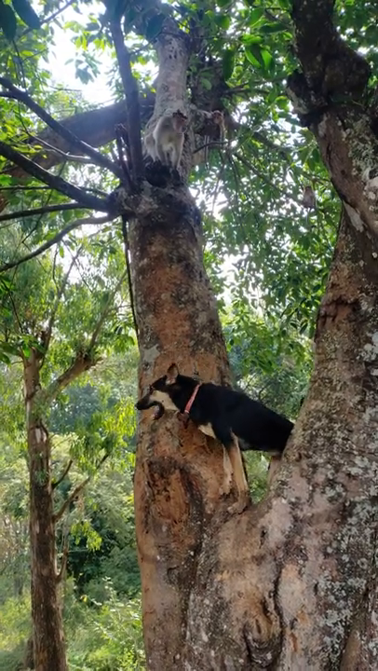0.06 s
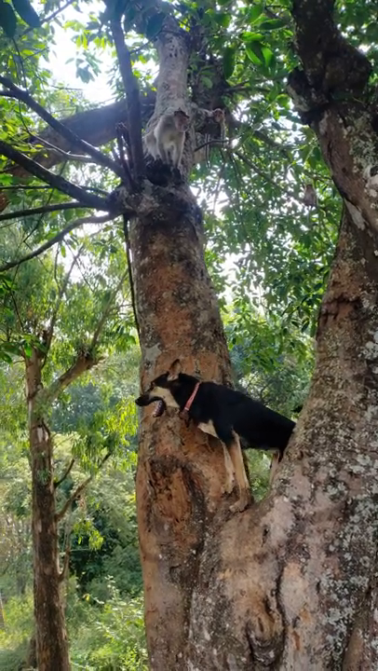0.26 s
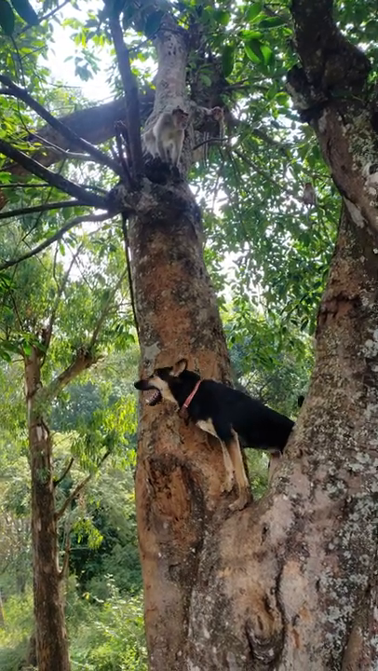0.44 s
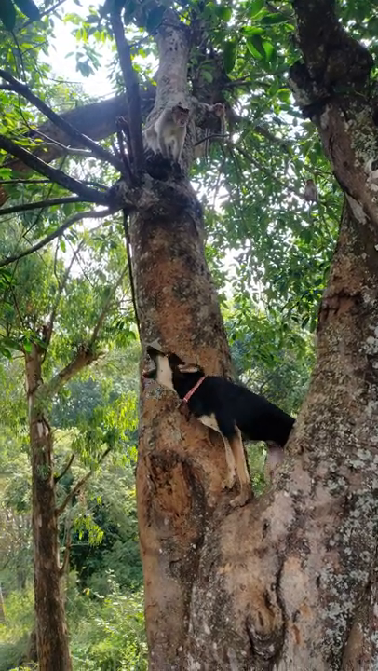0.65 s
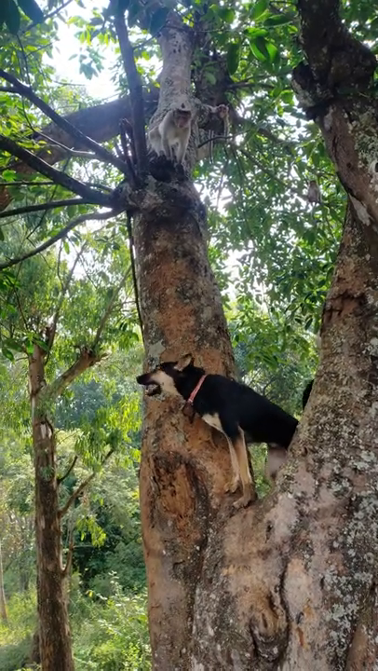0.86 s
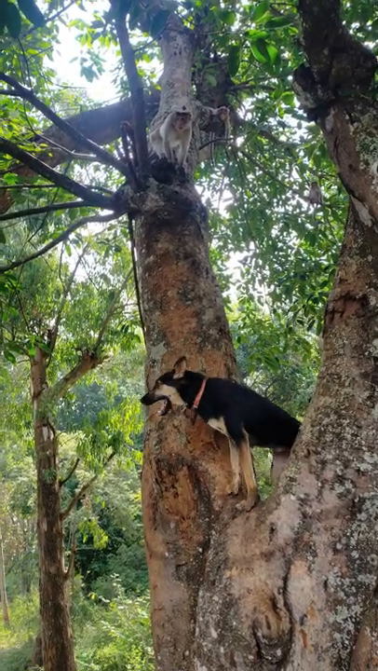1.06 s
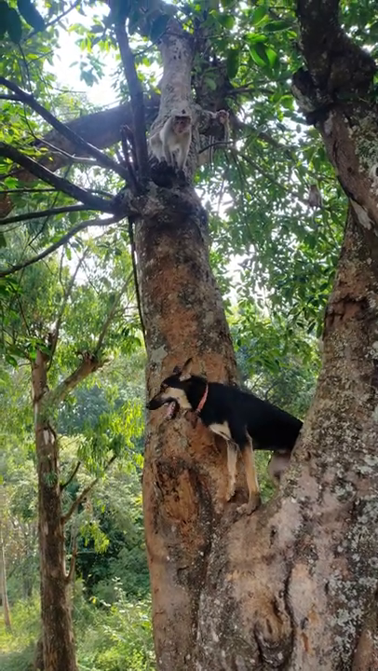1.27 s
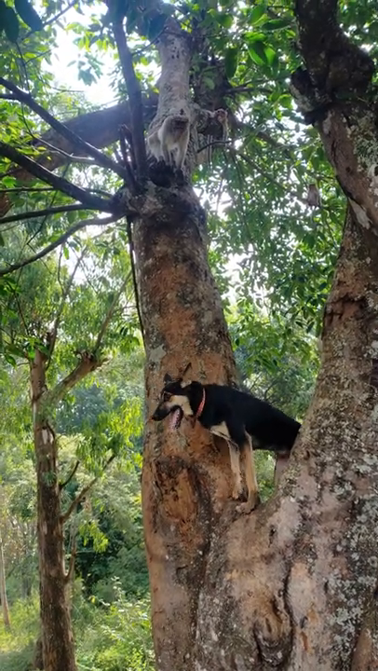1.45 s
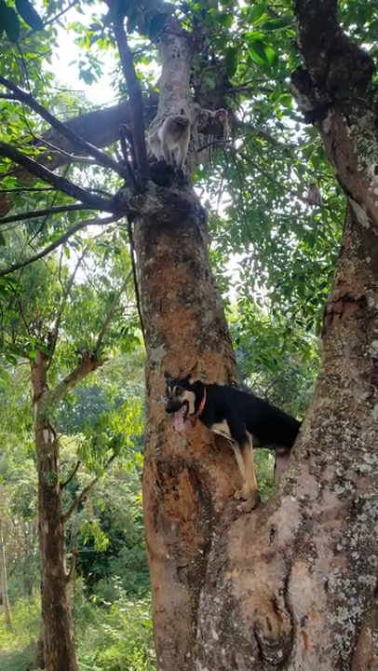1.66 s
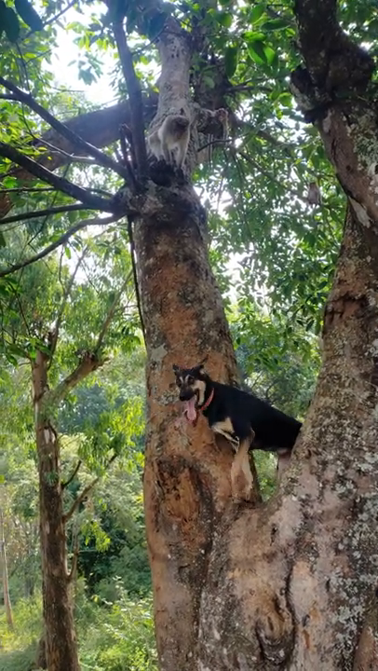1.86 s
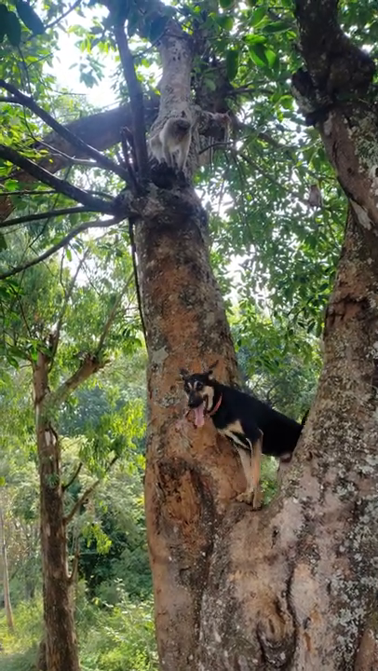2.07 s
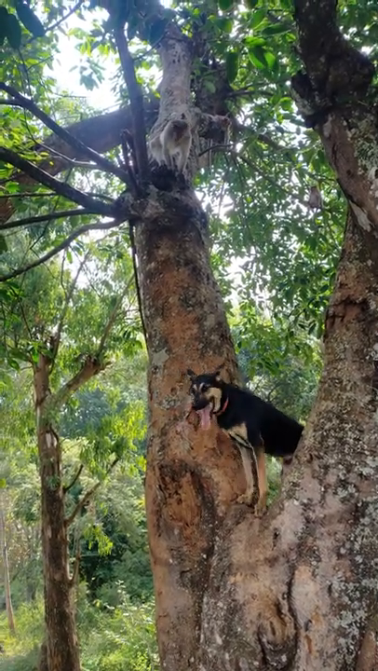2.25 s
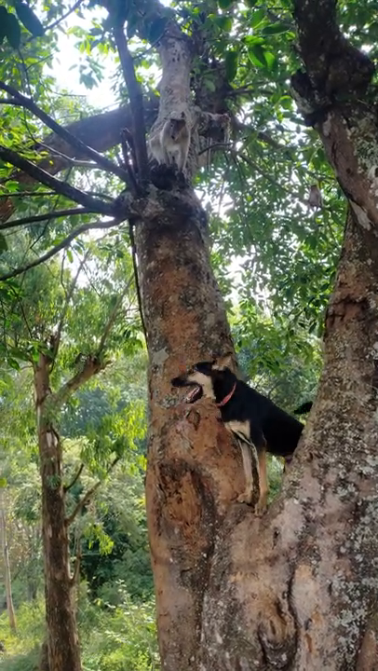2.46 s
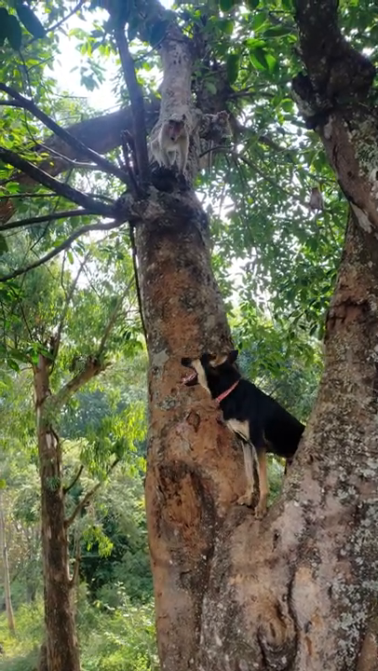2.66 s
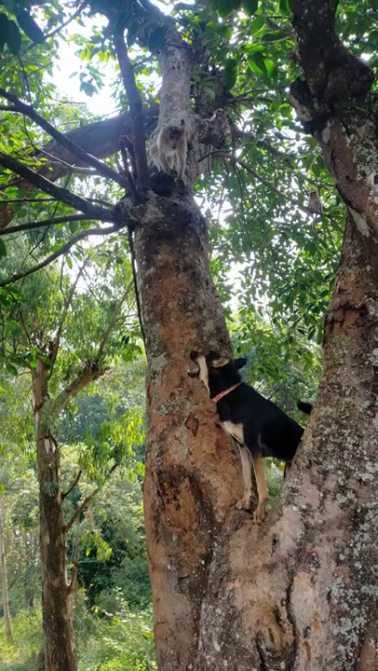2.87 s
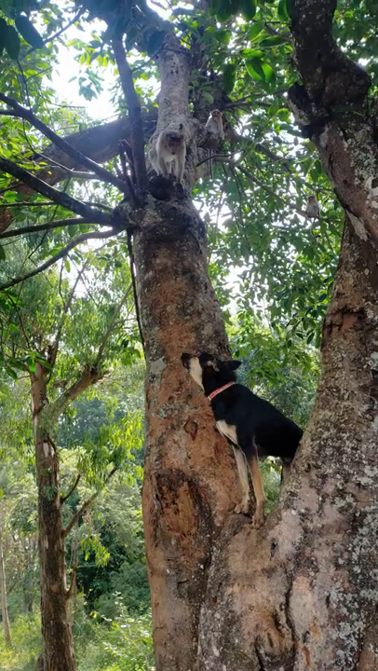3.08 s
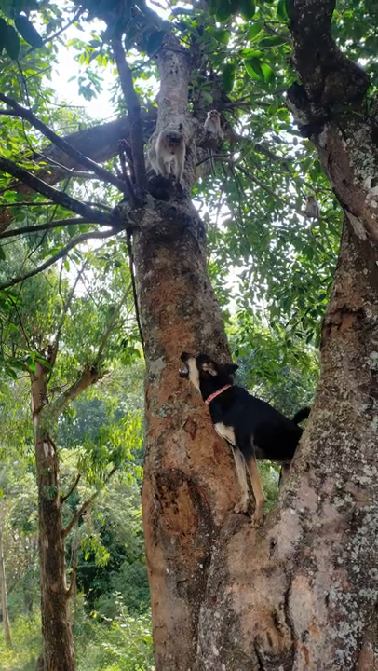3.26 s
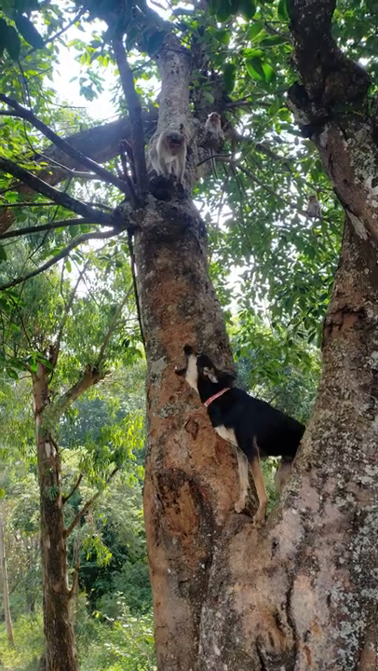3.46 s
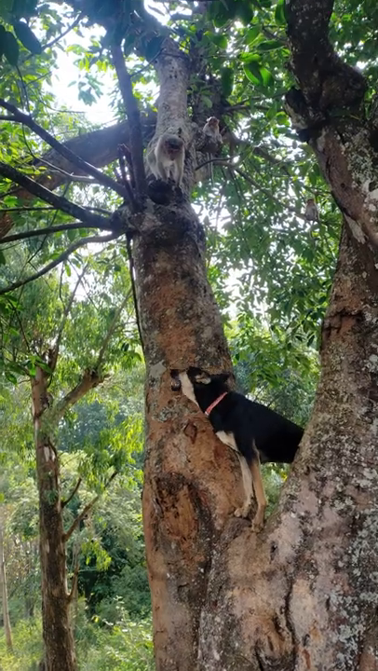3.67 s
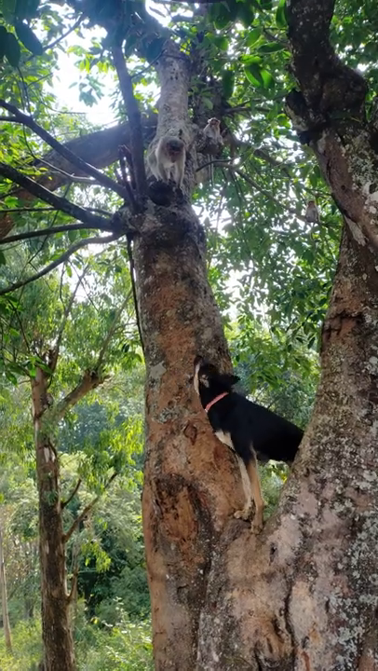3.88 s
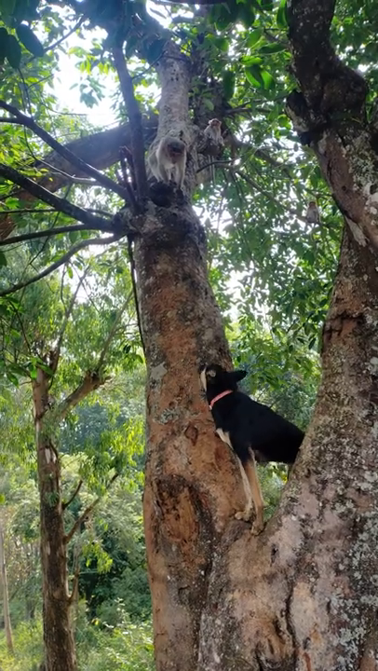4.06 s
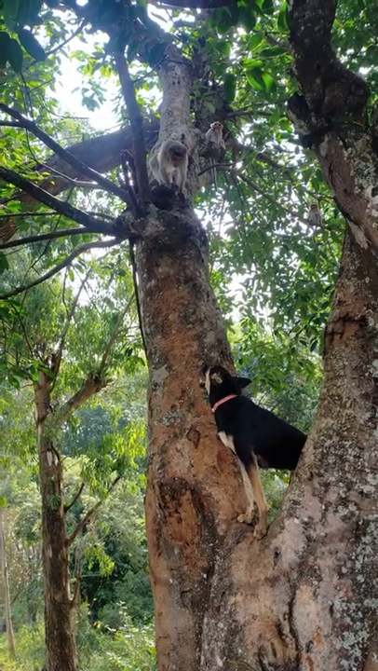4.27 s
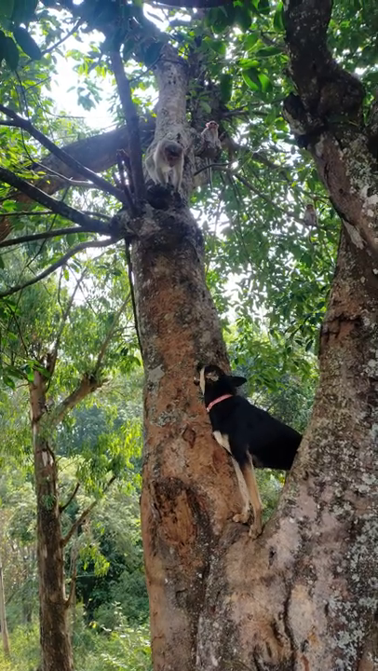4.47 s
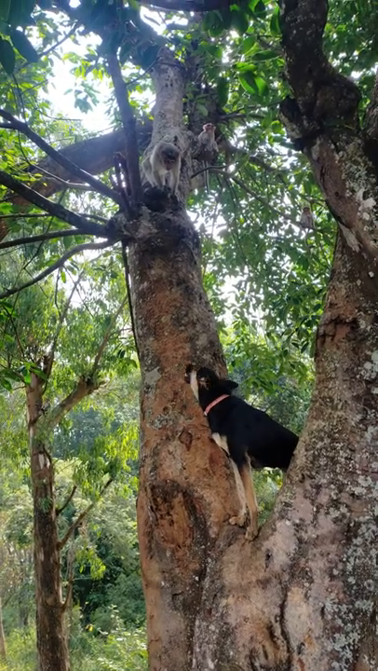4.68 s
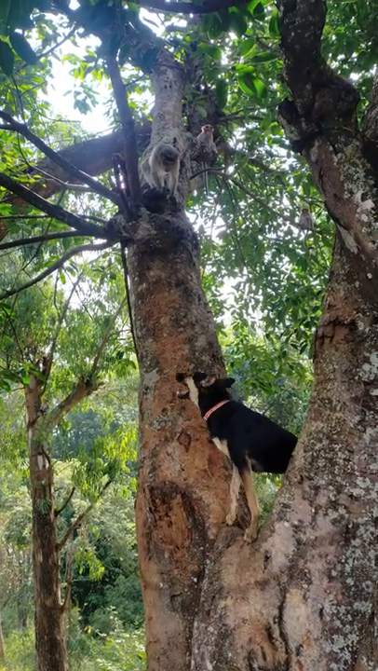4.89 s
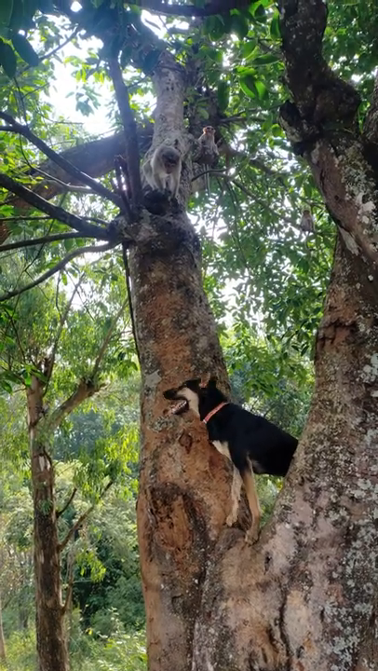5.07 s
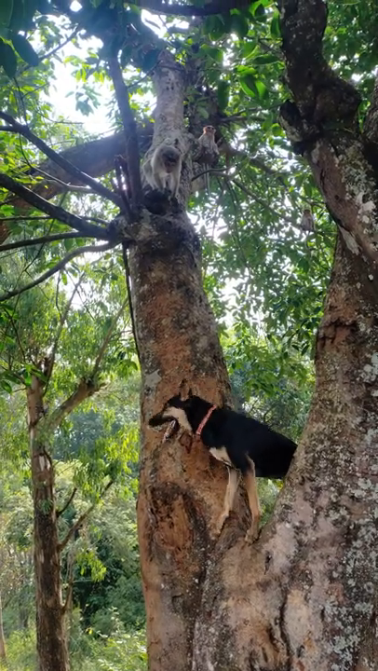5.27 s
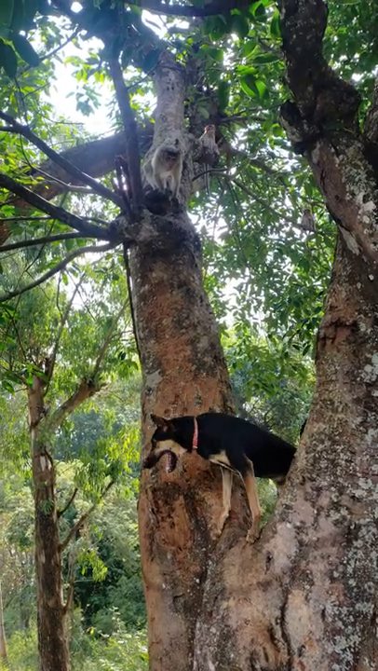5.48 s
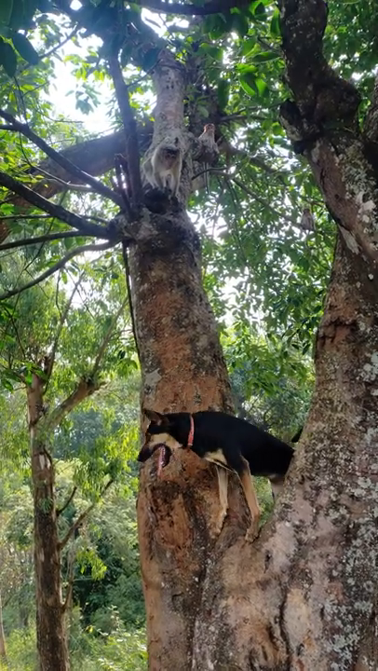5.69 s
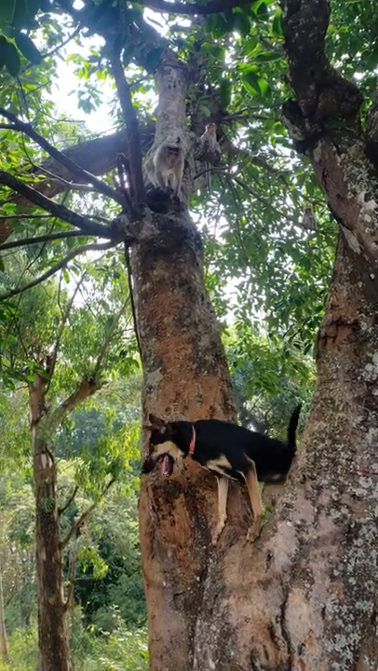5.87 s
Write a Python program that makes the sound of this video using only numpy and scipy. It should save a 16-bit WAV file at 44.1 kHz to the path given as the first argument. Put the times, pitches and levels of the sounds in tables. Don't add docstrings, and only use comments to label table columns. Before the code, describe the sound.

Five short, rough dog barks ring through woodland, with a rattling snore-like inhale after the first, over faint insects and light wind thumps.

```python
import sys
import numpy as np
from scipy import signal
from scipy.fft import rfft, irfft, next_fast_len
from scipy.io import wavfile
from scipy.ndimage import uniform_filter1d, minimum_filter1d

SR = 44100
rng = np.random.default_rng(int(sys.argv[2]) if len(sys.argv) > 2 else 0)


def persist_wave(psi):
    counts = np.round(np.clip(psi, -1, 1) * 32767).astype(np.int16)
    wavfile.write(sys.argv[1], SR, np.atleast_2d(counts).T)


def gain_from_db(level_db):
    decades = np.asarray(level_db, float) / 20
    return 10 ** decades


N = 261513
LEAD = SR
DELAY_S = .004
# t/s, level/dB, hum f/Hz, hum level/dB
SNORE_CURVE = [(2.44, -71.5, 204, -74), (2.55, -46, 191.7, -59.5), (2.62, -42, 190.5, -58),
               (2.68, -37, 185, -65.5), (2.75, -41.5, 177.3, -53.5), (2.83, -45, 156.3, -50),
               (2.88, -56, 132.3, -52.5), (2.92, -63, 122.5, -60)]


def evened(x):
    return x / np.sqrt(np.mean(x ** 2) + 1e-20)


def noise(length):
    return rng.standard_normal(length)


def read(points, hz):
    f, value = np.transpose(points)
    return np.interp(np.log(hz + 1), np.log(f + 1), value)


def columns(rows):
    s, *rest = np.transpose(rows)
    t = np.arange(s[0], s[-1], 1 / SR)
    return [t] + [np.interp(t, s, c) for c in rest]


def add(mix, s, sound):
    part = mix[round(s * SR):][:len(sound)]
    part += sound[:len(part)]


def coloured(x, points):
    size = next_fast_len(len(x) + 2048)
    gain = gain_from_db(read(points, np.fft.rfftfreq(size, 1 / SR)))
    return evened(irfft(rfft(x, size) * gain, size)[:len(x)])


def resonate(x, hz, width):
    turn = np.exp(2j * np.pi * np.cumsum(hz * np.ones(len(x))) / SR)
    r = np.exp(-np.pi * width / SR)
    once = signal.lfilter([1 - r], [1, -r], x / turn + 1e-18)
    return 2 * (turn * signal.lfilter([1 - r], [1, -r], once)).real


def drift(length, hz):
    width = max(int(SR / hz), 1)
    return evened(uniform_filter1d(uniform_filter1d(noise(length), width), width))


def air():
    # f/Hz, level/dB per Hz
    leaf_colour = [(88, -50), (150, -10), (752, -9.5), (847, -5), (1030, -10.5), (1330, -3), (1590, -17),
                   (1720, -7), (2220, -9.5), (3420, -12), (4330, -18), (7370, -12), (9700, -26),
                   (15300, -10.5), (16500, -21.5)]
    # f/Hz, width/Hz, level/dB
    insects = [(5350, 280, -71.5), (5667, 180, -72), (6474, 100, -71), (6830, 84, -74), (7190, 44, -68),
               (7370, 98, -69), (7727, 120, -73), (8100, 170, -72)]
    swell_db = drift(N, 1.4)
    out = gain_from_db(-59 + 0.91 * drift(N, 3.9)) * coloured(noise(N), leaf_colour)
    for hz, width, db in insects:
        out += gain_from_db(db + 0.49 * swell_db) * evened(resonate(noise(N), hz, width))
    return out


def wind():
    # t/s, level/dB
    gusts = [(0.0, -43), (0.26, -52.5), (0.63, -51), (0.69, -60.5), (1.53, -45.5), (1.8, -63.5),
             (2.84, -56), (3.15, -66), (3.2, -56.5), (4.1, -62), (4.21, -45.5), (4.61, -45), (4.74, -60),
             (4.84, -45), (5.33, -46), (5.37, -55.5), (5.85, -41.5), (5.93, -48)]
    t, thump_db = columns(gusts)
    flutter_db = -65.5 + 0.72 * (thump_db + 55)
    thump = coloured(noise(len(t)), [(5, 2), (20, 8.0), (45, 4.5), (70, -18), (120, -52.0)])
    flutter = coloured(noise(len(t)), [(40, -32), (65, 5.0), (110, -4.0), (200, -26.5), (400, -36.5)])
    lumps_db = drift(len(t), 14.0)
    pressure = gain_from_db(thump_db + 2.4 * lumps_db) * thump
    pressure += gain_from_db(flutter_db + 3.6 * lumps_db) * flutter
    return np.pad(pressure, (0, N))[:N]


def wood(x):
    # f/Hz, t60/s
    decay = [(250, 1.23), (700, 1.47), (1400, 1.79), (2500, 1.64), (5000, 4.5), (12000, 0.93)]
    # delay/s, spread/s, level/dB
    echoes = [(0.049, 0.02, -20.5), (.12, 0.023, -18), (0.199, 0.024, -33)]
    length = 2 * SR
    t, taps = np.arange(length) / SR, np.zeros(length)
    at = np.arange(400, length - 20, 20)
    taps[at + rng.integers(0, 20, len(at))] = rng.choice([-1., 1.], len(at))
    hz, frame_s, z = signal.stft(taps, SR, nperseg=256)
    dying = gain_from_db(-60 * frame_s / read(decay, hz)[:, None])
    tail = signal.istft(z * dying, SR, nperseg=256)[1][:length]
    back = gain_from_db(-19) * tail / np.linalg.norm(tail) * 1.257
    for delay, spread, db in echoes:
        echo = taps * np.exp(-.5 * ((t - delay) / spread) ** 2)
        back += gain_from_db(db) * signal.lfilter([.5], [1, -.5], echo / np.linalg.norm(echo))
    thin = signal.butter(2, 380, "high", fs=SR)
    return signal.lfilter(*thin, signal.fftconvolve(x, back)[:len(x)])


def wind_knocks():
    # t/s, f/Hz, level/dB
    puffs = [(4.44, 176, -50), (3.2, 130, -56), (2.4, 570, -64.5), (0.48, 55, -52), (1.4, 63, -54),
             (3.72, 106, -57), (.62, 90, -48), (0.063, 96, -50), (4.87, 90, -46.5), (5.08, 101, -52.5),
             (5.2, 78, -49.5)]
    out, size = np.zeros(N), 3000
    for s, hz, db in puffs:
        add(out, s - .03, gain_from_db(db) * evened(resonate(noise(size), hz, 66)) * np.hanning(size))
    return out


def twigs():
    # t/s, peak level/dB, ring f/Hz, brightness/dB, t60/s
    ticks = [(0.0713, -36.5, 1800, -27, 0.051), (1.3341, -28, 2380, -12, 0.019),
             (1.5272, -40, 1800, -6, 0.025), (1.54, -32.5, 1980, -27, 0.017),
             (1.5552, -35, 3030, -1.5, 0.064), (1.5812, -25.5, 4260, -4.5, 0.0095),
             (1.8893, -37, 3480, -10, 0.026), (1.918, -41, 1720, -17, 0.087),
             (2.1096, -40.5, 1710, -19, 0.02), (2.173, -45.5, 2417, 3, 0.014),
             (2.3974, -48.5, 1680, -1, 0.02), (5.218, -39.5, 1804, -18, 0.015),
             (5.548, -51, 5560, -6, 0.021), (5.8135, -36, 2600, -9, 0.027), (5.8286, -41, 3400, -1, 0.06),
             (5.844, -45, 2360, 2, 0.025), (5.869, -49, 2390, -5, 0.017)]
    size = 3000
    out, t = np.zeros(N), np.arange(size) / SR
    for s, db, hz, bright_db, t60 in ticks:
        burst = noise(size)
        ring = evened(resonate(burst, hz, 4500))
        crack = gain_from_db(bright_db + 5.5 - 2600 * t) * evened(resonate(burst, 14000, 7700))
        add(out, s, gain_from_db(db - 8.0 - 60 * t / max(t60, .003)) * (ring + crack))
    return out


def course(call, run_up_s, growl_db, end_s, hum_db, second_hz):
    # stage (-1 run-up starts, 0 snap, 1 close), chest hum/dB, breath over effort/dB
    stages = [(-1.1, -62.5, -11.5), (-0.62, -52, -21.5), (0, -45.5, -32), (0.26, -60, -29.5),
              (0.82, -65, -24), (0.062, -72.5, -26)]
    shut_jaw_hz, jaw_share = 790, 0.16
    (snap, _, first_hz, open_hz), (close, last_db, last_hz, shut_hz) = call[0], call[-1]
    before = [(snap - run_up_s, growl_db - 17, first_hz - 600 * run_up_s, shut_jaw_hz),
              (snap - 1e-4, growl_db, first_hz, open_hz)]
    after = [(close + end_s, last_db - 24, last_hz - 650 * end_s, shut_hz)]
    t, effort_db, hz, mouth_hz = columns(before + call + after)
    stage = np.interp(t, [t[0], snap, close, t[-1]], [-1, -0.014, 1, 1.8])
    at, chest_db, breath_db = np.transpose(stages + [(1.4, hum_db, stages[-1][2])])
    return (t, stage, effort_db, hz, np.interp(stage, at, chest_db), np.interp(stage, at, breath_db),
            mouth_hz, second_hz + jaw_share * (mouth_hz - shut_jaw_hz))


def vocal_folds(stage, hz, clearest):
    size = len(hz)
    share, clear_odd, clear_rough = clearest
    clear = np.exp(-((stage - share) / .29) ** 4)
    odd = .9 + (clear_odd - .9) * clear
    rough = .55 + (clear_rough - .55) * clear
    turns = np.cumsum(hz * (1 + .07 * rough * drift(size, 120))) / SR
    pulses = np.zeros(size)
    for k in range(3, 15):
        waver = gain_from_db((.8 + .22 * k) * drift(size, 60))
        fade = gain_from_db(-.006 * np.maximum(k * hz - 2280, 0))
        slip = .15 * (k - 3) * drift(size, 73)
        line = np.cos(2 * np.pi * k * turns + 0.0812 * k * k + slip)
        pulses += (odd if k % 2 else 1) * waver * fade * line
    pulses += np.clip(1 - 1.33 * odd, 0, 1) * np.cos(4 * np.pi * turns)
    gate = .3 + np.exp(-(2 * turns % 1) / .35)
    drive = (1 - rough) * pulses / np.sqrt(3.75 * (1 + odd ** 2))
    drive += 1.6 * rough * evened(gate * noise(size))
    drive += .24 * evened(resonate(gate * noise(size), 2200, 1500))
    return turns, gate, drive


def bark(call, around, clearest, highs):
    # width/Hz, level/dB
    moving = [(230, 2.5), (280, -2)]
    # f/Hz, width/Hz, level/dB
    upper = [(693, 160, -10.5), (1243, 207, -3), (1847, 547, -7.5), (2440, 520, -10.5)]
    # f/Hz, width/Hz, level/dB, fade/s
    snap_ring = (2940, 448, -25, 0.08)
    # f/Hz, level/dB per Hz
    teeth = [(1760, -37), (3000, -1), (3340, -3), (4220, -11), (4700, -8.5), (6570, -10.5), (9060, -23),
             (15100, -11.5), (16200, -13), (16500, -64)]
    # t/s, jump/dB
    flaps = [(.538, 8), (0.574, 10), (2.945, 8), (2.968, 6.5), (3.45, 1.5), (3.896, 7.5), (3.908, 4.5),
             (4.593, 7)]
    t, stage, effort_db, hz, chest_db, breath_db, *mouth_hz = course(call, *around)
    size = len(t)
    effort_db = uniform_filter1d(effort_db, 350)
    hz = uniform_filter1d(hz, 900)
    turns, gate, drive = vocal_folds(stage, hz, clearest)

    ring_hz, ring_width, ring_db, fade = snap_ring
    breath_extra_db, ring_extra_db = highs
    ring_db = ring_db + ring_extra_db * np.exp(-((t - call[0][0] - .015) / fade) ** 2)
    heard = t + DELAY_S
    flaps_db = sum(db * (heard > s) * np.exp(-abs(heard - s) / 0.011) for s, db in flaps)
    upper_db = (stage < 0) * (-5 + 0.32 * flaps_db)
    modes = [(f, *m) for f, m in zip(mouth_hz, moving)] + upper + [(ring_hz, ring_width, ring_db)]
    throat = np.zeros(size)
    for k, (f, width, db) in enumerate(modes):
        throat += (-1) ** k * gain_from_db(db + (k > 0) * upper_db) * resonate(drive, f, width)
    muzzle = signal.butter(3, [430, 3050], "band", fs=SR, output="sos")
    throat = signal.sosfilt(muzzle, throat)
    throat /= np.sqrt(uniform_filter1d(throat ** 2, 900) + 1e-12)

    breath = gain_from_db(breath_db + breath_extra_db) * gain_from_db(2.1 * drift(size, 50)) * coloured(gate * noise(size), teeth)
    voice = gain_from_db(effort_db + flaps_db) * (throat + breath)
    rumble = 0.94 * evened(resonate(noise(size), hz, 140))
    chest = gain_from_db(chest_db) * (np.cos(2 * np.pi * turns) + rumble)
    return (voice + chest) * signal.windows.tukey(size, .06)


def birds():
    # middle t/s, from f/Hz, to f/Hz, length/s, level/dB
    chirps = [
        (4.45, 2800, 3250, .1, -57),
        (4.53, 3300, 3380, .14, -62),
        (5.5, 2850, 2450, .03, -58),
        (5.8, 2800, 2500, .04, -60),
        (.605, 3300, 3000, .06, -54),
    ]
    out = np.zeros(N)
    for s, from_hz, to_hz, length, db in chirps:
        glide = np.linspace(from_hz, to_hz, int(length * SR))
        tone = np.sin(2 * np.pi * np.cumsum(glide) / SR)
        add(out, s - length / 2, gain_from_db(db) * tone * np.hanning(len(glide)))
    return out


def far_note():
    # multiple of the pitch, level/dB
    overtones = [(1, -69.5), (2, -69.5), (3.3, -78.5)]
    start_s, length_s = 1.6, 0.93
    share = np.arange(0, length_s, 1 / SR) / length_s
    size = len(share)
    turns = np.cumsum((880 - 47.55 * share) * (1 + 0.0048 * drift(size, 36))) / SR
    notes = sum(gain_from_db(db + 4.2 * drift(size, 39)) * np.cos(2 * np.pi * k * turns) for k, db in overtones)
    out = np.zeros(N)
    add(out, start_s, np.sqrt(2) * gain_from_db(4.5 * share) * notes * signal.windows.tukey(size, .15))
    return out


def snore():
    # f/Hz, level/dB per Hz
    rattle_colour = [(47, -62), (80, -32), (173, -2.5), (325, -9), (690, -1), (746, -1.5), (909, 4.5),
                     (1090, -6.5), (1750, -2), (2390, -20), (3420, -18.5), (7100, -22.5), (9000, -47),
                     (11700, -68.5), (19800, -120)]
    # f/Hz, width/Hz, level/dB
    nose = [(3500, 250, -16.5), (4630, 380, -29)]
    t, level_db, hum_hz, hum_db = columns(SNORE_CURVE)
    size = len(t)
    flap = ((t - 2.451) * 30.2 + .05 * drift(size, 13)) % 1
    depth = np.clip(1 - (t - t[0]) / .35 * .8, .2, 1)
    chop = 1 - depth + 1.37 * depth * np.minimum(flap / 0.19, 1) * np.exp(-(flap / .5) ** 3)
    turns = np.cumsum(129.8 * (1 + 0.27 * drift(size, 60))) / SR
    gate = 0.19 + np.exp(-(turns % 1) / 0.52)
    drive = np.diff(np.floor(turns), prepend=0) * 8 + gate * noise(size)
    rattle = coloured(drive, rattle_colour)
    rattle += sum(gain_from_db(db) * evened(resonate(drive, hz, width)) for hz, width, db in nose)
    rush = np.sqrt(chop) * gate * noise(size)
    hiss = evened(resonate(resonate(rush, 14100, 5000), 14400, 5400))
    hum = gain_from_db(hum_db) * np.sqrt(2) * np.cos(2 * np.pi * np.cumsum(hum_hz) / SR)
    breath = gain_from_db(level_db) * (rattle + gain_from_db(-10) * hiss) + hum
    return chop * breath * signal.windows.tukey(size, .1)


def scene():
    # t/s, effort/dB, slow fold rate f/Hz, first throat resonance f/Hz
    calls = [
        [(0.641, -20, 193.3, 580), (0.69, -15.5, 210.3, 596), (0.724, -20, 248.7, 774),
         (0.748, -15.5, 244.7, 794), (0.772, -21, 203.8, 750)],
        [(2.972, -33.5, 169.7, 680), (3.005, -13.5, 192.1, 674), (3.058, -19, 247.6, 770),
         (3.098, -17.5, 234.7, 690), (3.12, -21, 214, 630)],
        [(3.447, -28, 197.4, 620), (3.471, -14, 204.8, 600), (3.521, -17, 224.7, 687), (3.569, -17, 217, 770),
         (3.59, -23.5, 207.3, 776)],
        [(3.92, -22.5, 188, 610), (3.936, -16.5, 185.6, 612), (3.972, -17, 214.4, 767),
         (4.016, -18, 225.5, 830), (4.065, -22, 201, 800)],
        [(4.608, -20.5, 201.7, 740), (4.648, -14.5, 205.5, 716), (4.688, -19, 244.9, 880),
         (4.708, -17, 234.3, 810), (4.742, -20.5, 192, 800)],
    ]
    # growled run-up/s, growl at the snap/dB, dying end/s, chest hum/dB, second resonance f/Hz
    arounds = [
        (.118, -33.5, 0.054, -64, 1297),
        (.082, -41, 0.046, -58, 1375),
        (.037, -33.5, .06, -57.5, 1284),
        (.08, -35.5, .08, -51, 1363),
        (.088, -35.5, .075, -56, 1380),
    ]
    clearest = [
        (.62, .2, .25),
        (.57, .2, .25),
        (.3, .8, .4),
        (.55, .75, .3),
        (.7, .7, .42),
    ]
    # breath/dB, bright ring at the snap/dB
    bark_highs = [(-0.5, 3), (3.5, 6), (1, 16.5), (2, 20), (0, 16)]
    dog = np.zeros(LEAD + N)
    for parts in zip(calls, arounds, clearest, bark_highs):
        start = LEAD / SR + DELAY_S + parts[0][0][0] - parts[1][0]
        add(dog, start, bark(*parts))
    add(dog, start - 5, gain_from_db(-1.5) * bark(*parts))
    add(dog, LEAD / SR + SNORE_CURVE[0][0], snore())
    small_sounds = wind_knocks() + twigs() + birds() + far_note()
    return ((dog + wood(dog))[LEAD:] + air() + wind() + small_sounds)[None]


def roll_off(x):
    return signal.sosfilt(signal.butter(12, 16680, fs=SR, output="sos"), x)


def record(dry):
    ceiling = .47
    room_left = minimum_filter1d(ceiling / np.maximum(abs(dry), ceiling), 301)
    limited = dry * uniform_filter1d(room_left, 301)
    edge = signal.firwin(301, 15900, window=("kaiser", 8), fs=SR)
    return roll_off(signal.oaconvolve(limited, edge[None], "same"))


dry = scene()
out = record(dry)
persist_wave(out)
```